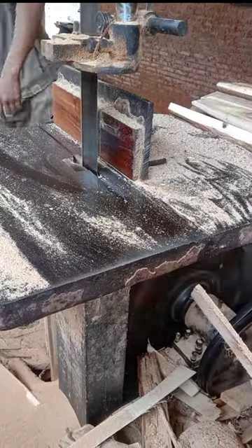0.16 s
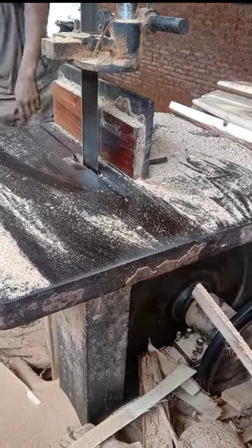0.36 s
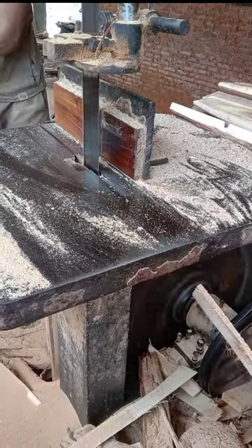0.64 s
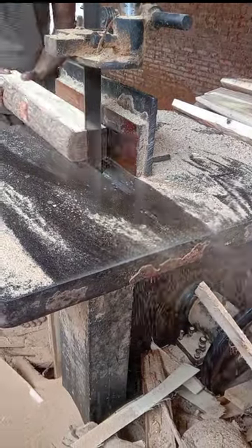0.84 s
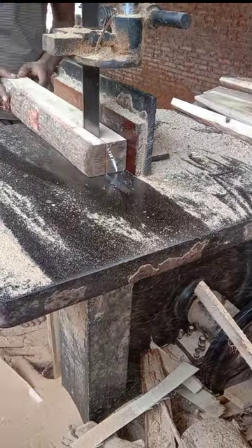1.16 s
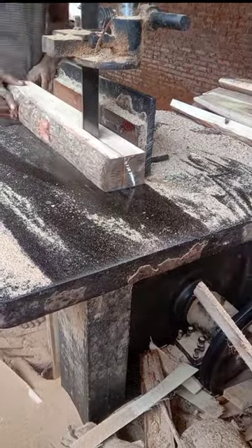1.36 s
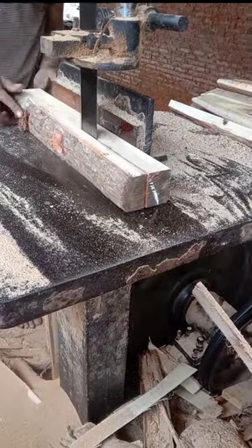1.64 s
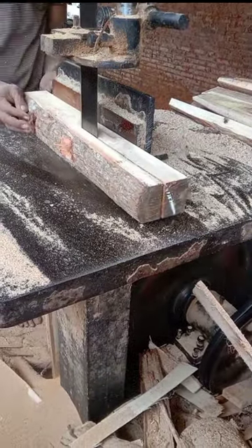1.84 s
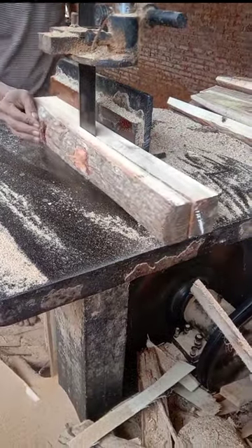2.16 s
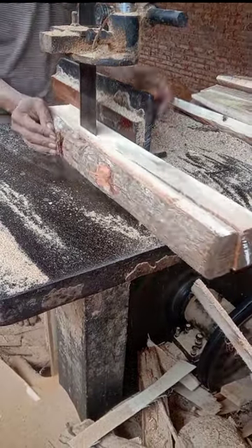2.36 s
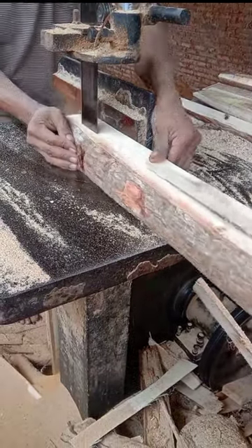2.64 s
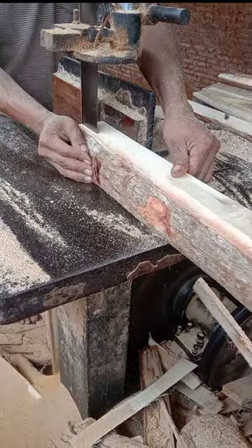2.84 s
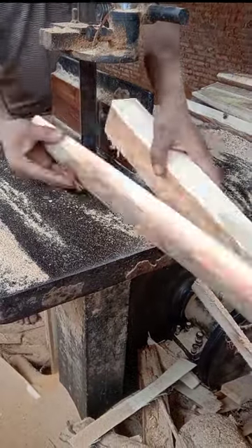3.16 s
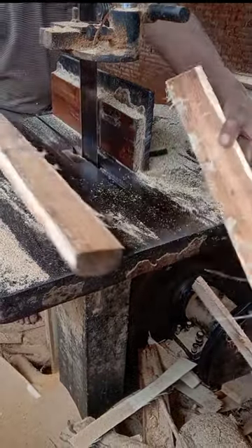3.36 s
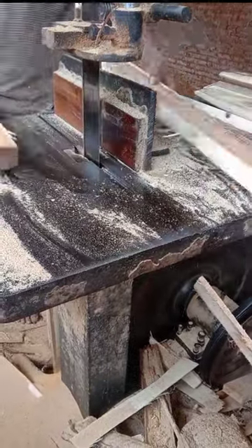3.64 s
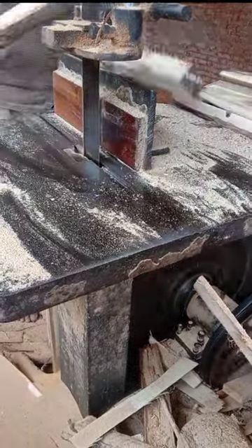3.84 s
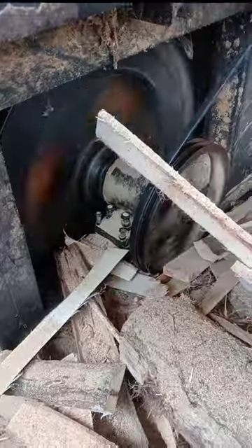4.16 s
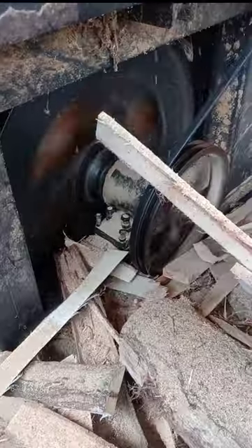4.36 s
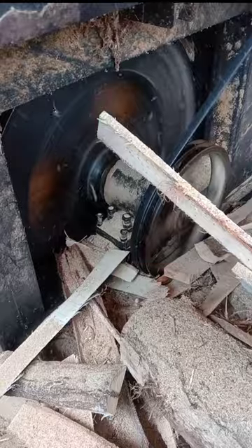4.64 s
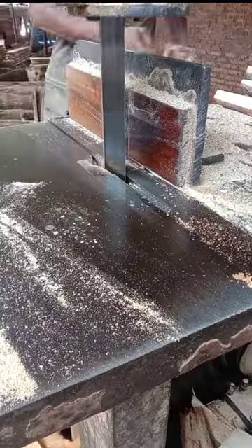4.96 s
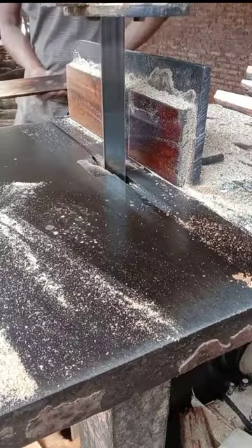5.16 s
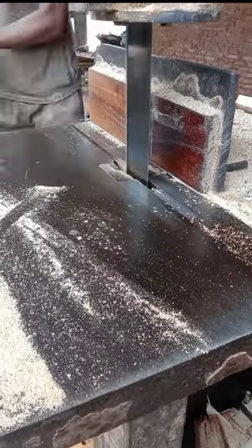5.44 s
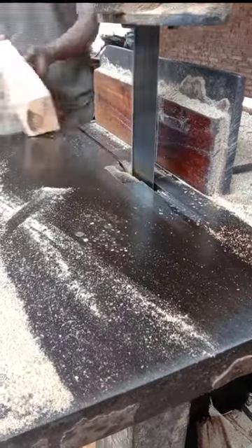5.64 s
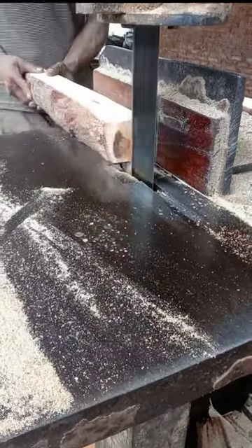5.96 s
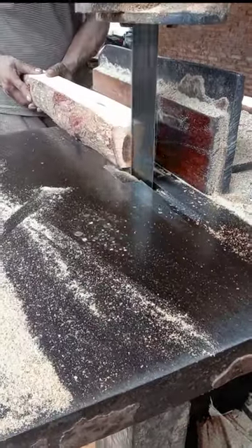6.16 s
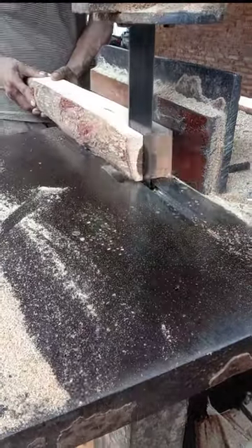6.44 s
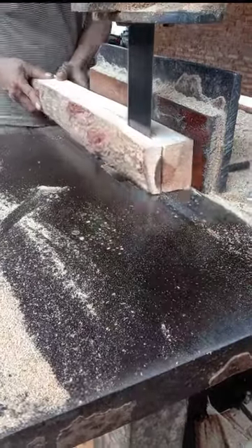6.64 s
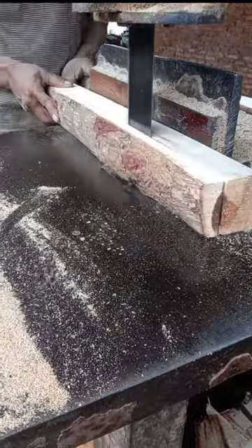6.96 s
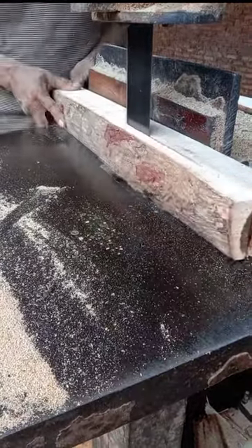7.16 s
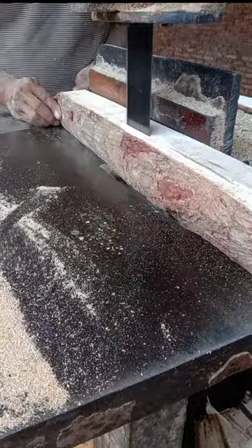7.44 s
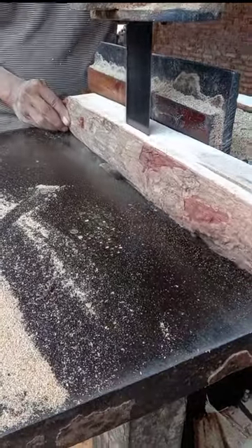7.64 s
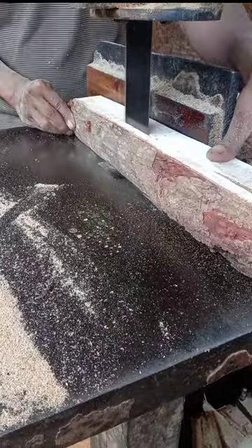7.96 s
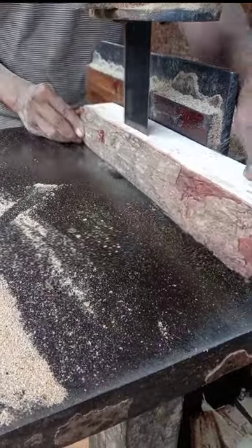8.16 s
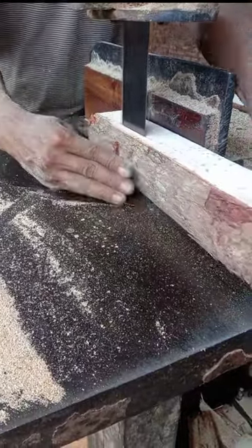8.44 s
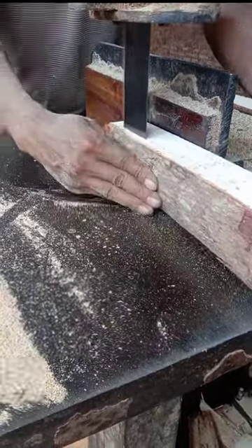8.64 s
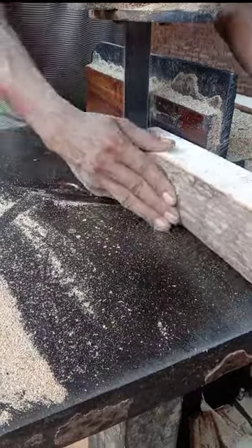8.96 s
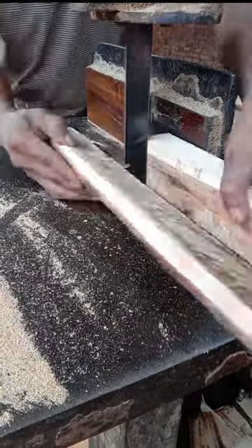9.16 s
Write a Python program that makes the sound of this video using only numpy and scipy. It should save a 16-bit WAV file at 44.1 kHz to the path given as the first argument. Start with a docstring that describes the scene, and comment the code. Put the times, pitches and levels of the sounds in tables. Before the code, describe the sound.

A thumping engine drives a hissing, ringing band saw in a workshop, with two timbers ripped lengthwise, the second rasping and whining louder.

```python
"""In an open brick workshop a single-cylinder engine thumps and a band saw runs free: wheels ring, blade hisses.
From 0.8 to 2.9 s a timber is ripped: wood rubs, chips tap near the microphone, teeth rasp and whine.
At 4.0 and 4.6 s the listening spot changes at once, from beside the table to the lower wheel, then before the blade.
From 6.2 to 8.8 s a second timber is ripped, louder, with more rubs and taps; then the saw runs free again.
Pulses ring resonances for the exhaust, shaped noise makes rings and hisses, sines make the whine."""
import sys
import numpy as np
from scipy import signal
from scipy.fft import rfft, irfft
from scipy.io import wavfile

SR = 44100
rng = np.random.default_rng(int(sys.argv[2]) if len(sys.argv) > 2 else 0)


def put_to_file(sound):
    """Save the sound as 16-bit audio at rate SR, in the file named by the first command-line argument."""
    columns = np.atleast_2d(sound).T  # one column per channel
    safe = np.clip(columns, -1, 1)
    whole_steps = np.round(safe * 32767)
    wavfile.write(sys.argv[1], SR, whole_steps.astype(np.int16))


N = 410130

# Listening spots: beside the table, by the lower wheel, before the blade. Each entry: start in seconds.
SPOT_STARTS = [0, 4.0, 4.6]
# The machine running free. Each row is a spot: exhaust, wheel ring, housing drone, guide hiss, air hiss, all in dB.
SPOT_LEVELS = [(-29, -27, -31.5, -26, -29.5), (-29, -21, -31, -27, -33), (-29.5, -23, -34, -26, -30)]
# Timber on the table shades those five layers, in the same order. Each entry: change in dB while cutting.
TIMBER_SHADE = [-1.3, -0.83, -0.5, -1.43, -2]
# Rise and fall about those levels. Each row: time in seconds, whole machine in dB, extra for the air hiss in dB.
SWELL = [(0, 0.1, 1), (.75, -0.7, 2), (1.5, -0.1, 0.5), (2.1, 0.1, -0.5), (2.75, -.5, -1.5), (2.9, 1.3, -2),
         (3.2, 0, 0.5), (4.0, 0.2, -0.5), (4.6, 0.4, 0.5), (5.5, -.2, 1.2), (6.1, .2, 1.3), (6.33, -2.5, 2),
         (6.5, .4, 1.5), (7.15, 0.5, -1.2), (7.45, -0.8, -3), (7.7, 0.4, -2), (8.3, -0.7, 0.5),
         (8.8, .5, -3.5), (9.3, 0.1, -0.5)]

# Engine speed, sagging in the cuts and stepping near the changes of spot. Each row: time in seconds, firings per s.
ENGINE_SPEED = [(0, 22.24), (.45, 22.3), (.8, 22.63), (1.3, 21.99), (2.4, 21.54), (2.88, 21.54),
                (3.1, 22.04), (3.7, 22.32), (4.0, 22.5), (4.01, 21.76), (4.58, 21.77), (4.6, 22.15),
                (5.7, 22.57), (6.45, 22.33), (6.85, 21.73), (8.65, 21.84), (8.9, 21.96), (9.3, 22.3)]
# Jumps of the beat. Each row: time in seconds, share of a firing cycle lost (gained if negative).
BEAT_JUMPS = [(.67, 0.3), (4.0, 0.25), (4.6, .21), (5.33, -0.43)]
# Tones of the exhaust pipe. Each row: pitch in Hz, width of one filter pass in Hz, relative level in dB,
# delay after the firing in ms.
EXHAUST_TONES = [(89, 31, -26.5, 1.9), (137.6, 30.5, -10, 1.07), (179.4, 104, -2, 4.77),
                 (218, 183, 3.5, 21.43), (301.3, 77, 2, 31), (408.4, 41, -10, 12.28), (490, 49, -7.5, 21),
                 (560.4, 46.7, -4, 13), (644, 43, -12.5, 20)]
# Uneven colour of the exhaust: weak near 154 and 220 Hz, strong near 176 Hz.
# Each row: frequency in Hz, gain in dB.
EXHAUST_COLOUR = [(40, 2.5), (135, 1.5), (154, -7.5), (176, 4.5), (198, -2.5), (220, -3.5), (243, 1.5),
                  (270, 0), (1500, 0.5)]
# Rumble of frame and belt. Each row: frequency in Hz, relative level in dB per Hz.
RUMBLE_SPECTRUM = [(15, -62), (25, -8), (81, -20), (172, 3), (303, -10), (371, -3), (557, -2.5), (702, -25),
                   (800, -14.5), (1040, -51), (1760, -120)]
# Ring of the wheels. Each row: pitch in Hz, width of one filter pass in Hz, relative level at each spot in dB.
WHEEL_MODES = [(2207, 13, -1, -7, 0.5), (2246, 39, 0, -5, -10), (2297, 28, -7, -14, -4),
               (2323, 36, -7, -5, -5.5), (2353, 26, 2, -3, -4), (2391, 37, -2, 1.5, -0.5),
               (2454, 55, -1.5, 0, -7), (2481, 27, -2, -6, -3), (2539, 154, -8, -5, -12.5)]
# Drone of the housing, one list a spot. Each row: frequency in Hz, relative level in dB per Hz.
HOUSING_SPECTRA = [
    [(360, -13), (620, -14), (800, -11.5), (980, -15.5), (1070, -10.5), (1240, -18), (1290, -10.5),
     (1870, -7), (2110, -7), (2150, -3), (2800, -40), (4730, -120)],
    [(360, -16), (620, -5), (748, -21), (779, -12), (965, -11), (1130, -6), (1420, -1), (1570, -7),
     (1850, -9), (2150, -5.5), (2800, -36), (4730, -120)],
    [(360, -41), (620, -14), (752, -14.5), (830, -9), (916, -12), (1000, -9), (1570, -4), (1920, -14),
     (2110, -3.5), (2150, -8), (2800, -47), (4730, -120)],
]
# Hiss of the blade guides, one list a spot. Each row: frequency in Hz, relative level in dB per Hz.
GUIDE_SPECTRA = [
    [(1560, -16), (2650, -3.5), (3110, -2), (4020, -6.5), (4740, -4), (5450, -7.5), (5720, -4.5),
     (6000, -3.5), (6640, -2), (7200, -6), (7470, -3), (9500, -8), (12400, -31), (20900, -120)],
    [(1560, -33), (2650, -7), (3190, -9.5), (3440, -12), (4080, -7.5), (5000, -9), (6640, -6),
     (7960, -11.5), (8220, -14), (9500, -16.5), (12400, -38), (20900, -120)],
    [(1560, -14), (2650, -8), (2710, -6.5), (2890, -6), (3790, -7.5), (4430, -6), (4980, -7), (5660, -6),
     (5840, -13), (6130, -0.5), (7840, -9), (9500, -10.5), (12400, -30), (20900, -120)],
]
# Narrow rings of the blade. Each row: pitch in Hz, width in Hz, relative level at each spot in dB.
BLADE_MODES = [(3540, 200, -10, -4, -11), (4637, 130, -8.5, -7, -20), (4930, 79, -3, -20, -22),
               (5985, 110, 1, -5, 4.5), (6180, 64, -0.5, -3, -4), (6750, 92, -11, -3, 0.5),
               (6890, 150, 0, -14, 1.5), (7070, 110, 2.5, -9, -7), (7380, 110, -2, -14, 0.5),
               (7700, 68, -6, 0, -10), (8240, 130, -10, -18, -4), (8740, 110, -12, -9, -10),
               (9250, 100, -8, -6, -10), (9900, 70, -20, -9, -6), (10340, 80, -11, -9, -21),
               (10700, 90, -16, -10, -20), (11490, 110, -3.5, -13, -9), (12650, 120, -13, -11, -13.5),
               (13370, 100, -16, -10, -8)]
# Hiss of the air. Each row: frequency in Hz, relative level in dB per Hz.
AIR_SPECTRUM = [(5000, -8.5), (8500, -3.5), (8740, -9.5), (9740, -4), (10300, -3.5), (13100, -0.5),
                (13900, -5), (15700, -16.5)]

# Rubs of wood, dull on the table, shrill on the blade. Each row: start in seconds, length in seconds,
# pitch in Hz, width of one filter pass in Hz, level in dB.
WOOD_RUBS = [(.68, 0.39, 149, 150, -39), (0.832, 0.12, 1630, 60, -41), (.84, 0.069, 11300, 500, -32),
             (1.02, .04, 10900, 200, -34), (1.9, 0.13, 4450, 500, -32), (2.836, 0.077, 3050, 400, -30),
             (3.422, 0.13, 200, 200, -36), (4.609, .02, 1590, 300, -27), (6.131, 0.21, 170, 200, -39),
             (6.65, 0.71, 5320, 1600, -27.5), (7.718, 0.2, 300.4, 400, -34), (8.02, .05, 5130, 199.2, -34),
             (8.101, 0.085, 250, 300, -36), (8.665, 0.079, 4790, 200, -35), (8.7, 0.17, 250, 300, -32),
             (8.788, 0.4, 3560, 160, -35)]
# Chips and timber bumps. Each row: time in seconds, strength in dB.
TAPS = [(0.774, -21), (0.829, -21), (6.191, -19), (6.301, -19.5), (6.342, -21), (6.367, -23), (6.54, -23),
        (6.609, -20), (7.774, -34), (8.143, -21), (8.645, -24)]
# Modes of a tap. Each row: pitch in Hz, relative level in dB, time to fall by 60 dB in seconds.
TAP_MODES = [(350, 1, 0.01), (675, 4.5, 0.0059), (1100, -3.5, 0.0059)]
# The two cuts. Each row: teeth enter in seconds, teeth leave in seconds, high whine in dB.
CUTS = [(.78, 2.86, -50), (6.2, 8.78, -49)]
# How hard the teeth bite. Each row: time in seconds, rasp in dB, low whine in dB.
BITE = [(.8, -47, -54), (1.2, -44, -54), (1.6, -38, -55), (2.4, -36.5, -52), (2.86, -41, -52),
        (6.2, -39, -48), (6.6, -30.5, -43), (7.0, -33.5, -44), (7.2, -30.5, -46), (7.5, -33.5, -42),
        (8.05, -30.5, -36.5), (8.14, -29, -41), (8.22, -31, -36.5), (8.45, -33, -38.5), (8.6, -31.5, -42),
        (8.75, -27, -42)]
# Rasp of teeth in wood. Each row: frequency in Hz, relative level in dB per Hz.
RASP_SPECTRUM = [(2500, 3.5), (3200, -1.5), (4200, 2), (5200, 7.5), (6500, -8), (9000, -60), (13000, -23),
                 (15500, -6)]
# Whine of the teeth. Each row: multiple of the tooth rate, relative level in dB.
TOOTH_OVERTONES = [(2, -5.5), (3, -18), (4, -2), (5, 4.5), (6, -15), (7, 3), (8, -10), (9, -6), (12, -11),
                   (13, 5), (14, 1), (15, -11), (16, 10), (17, 5), (18, -6), (19, -8)]

FIRING_SPREAD_DB, FIRING_JITTER_MS, TONE_WANDER_DB = 0.8, 0.08, 1.3
# The labouring engine sounds deeper: tones under DEEP_HZ gain LABOUR_DB per firing a second lost.
DEEP_HZ, FREE_FIRINGS_PER_S, LABOUR_DB = 200, 22, 4.5
RUMBLE_DB = -43
BLADE_RING_DB, WOOD_DAMPING_DB = -4, -2   # wood around the blade damps its rings
ECHO_DB, ECHO_SPAN_MS = -18, 5   # close reflections from table and wall
TAP_LOW_HZ = 200
ENTER_S, LEAVE_S = 0.062, 0.066
TEETH_PER_FIRING = 37
HIGH_WHINE_FROM = 10   # first tooth multiple counted as high
MIC_LOW_HZ, CUTOFF_HZ = 29.8, 15500


def from_db(db):
    """Gain of a level in dB."""
    return np.exp(np.asarray(db) * (np.log(10) / 20))


def rms_one(x):
    """Scales to rms 1."""
    return x / np.sqrt(np.mean(x ** 2) + 1e-20)


def in_time(rows):
    """Each column of a curve at every sample, joined by straight lines."""
    times, *columns = np.transpose(rows)
    return [np.interp(np.arange(N) / SR, times, column) for column in columns]


def by_spot(sounds):
    """Plays each spot's sound while the listener is there."""
    spot = np.searchsorted(SPOT_STARTS, np.arange(N) / SR, "right") - 1
    return np.choose(spot, sounds)


def drift(rate_hz):
    """Slow random wander of rms 1: noise through two equal low-pass poles."""
    step = 40   # samples between computed points
    r = np.exp(-2 * np.pi * rate_hz * step / SR)
    noise = rng.standard_normal(N // step + 2002)
    slow = signal.lfilter([1], [1, -2 * r, r * r], noise)[2000:]   # settled part only
    return np.interp(np.arange(N) / step, np.arange(len(slow)), rms_one(slow))


def resonance(x, hz, width_hz):
    """Two-pole band-pass, gain about 1 on top."""
    r = np.exp(-np.pi * width_hz / SR)
    poles = [1, -2 * r * np.cos(2 * np.pi * hz / SR), r * r]
    return signal.lfilter([(1 - r * r) / 2, 0, (r * r - 1) / 2], poles, x)


def steep(x, hz, width_hz, count):
    """The same resonance several times over: steep skirts, soft rise and fall."""
    for _ in range(count):
        x = resonance(x, hz, width_hz)
    return x


def coloured(x, spectrum):
    """Shapes a signal by (Hz, dB) points, 90 dB down outside them; rms 1."""
    hz, level_db = np.transpose(spectrum)
    grid_hz = np.maximum(np.arange(N // 2 + 1) * SR / N, 1)
    gain = from_db(np.interp(np.log(grid_hz), np.log(hz), level_db, left=-90, right=-90))
    return rms_one(irfft(rfft(x) * gain, N))


def hiss(spectrum, flutter_db):
    """Coloured noise whose level flutters; rms 1."""
    flutter = from_db(flutter_db * drift(35.0))
    return coloured(rng.standard_normal(N) * flutter, spectrum)


def ringing(modes, flutter_db, count):
    """Friction noise keeps every mode ringing, each swelling on its own; one sound a spot, rms 1."""
    friction = rng.standard_normal(N)
    rings = []
    for k, (hz, width_hz, *_) in enumerate(modes):
        swelling = from_db(flutter_db * drift(2.7))
        rings.append((-1) ** k * swelling * steep(friction, hz, width_hz, count))
    return [rms_one(from_db(spot_db) @ rings) for spot_db in np.transpose(modes)[2:]]


def reflected(x):
    """Eight close echoes of random delay ripple the spectrum; rms 1."""
    lags = (rng.uniform(0.15, 1, 8) * ECHO_SPAN_MS * SR / 1000).astype(int)
    echoes = sum((-1) ** k * np.roll(x, lag) for k, lag in enumerate(lags))
    return rms_one(x + from_db(ECHO_DB) * echoes)


def crank():
    """Firing cycles done so far: the engine speed summed up, with the jumps of the beat."""
    turns = np.cumsum(in_time(ENGINE_SPEED)[0]) / SR + 0.2
    return turns - sum(share * (np.arange(N) > s * SR) for s, share in BEAT_JUMPS)


def exhaust(turns):
    """Each firing sends a pulse into every pipe tone after its own delay; each tone swells and dies softly."""
    cycles = np.maximum.accumulate(np.floor(turns))   # a lost share never fires twice
    firings = np.flatnonzero(np.diff(cycles))
    firings = np.r_[2 * firings[0] - firings[1], firings]   # one already under way at the start
    chance = rng.standard_normal((len(firings), 2))
    deep_db = LABOUR_DB * (FREE_FIRINGS_PER_S - in_time(ENGINE_SPEED)[0])
    out = np.zeros(N)
    for hz, width_hz, level_db, delay_ms in EXHAUST_TONES:
        delay = (delay_ms + FIRING_JITTER_MS * chance[:, 0]) * SR / 1000
        when = np.clip(firings + delay.astype(int), 0, N - 1)
        pulses = np.full(N, 1e-18)   # tiny floor keeps the filters quick
        pulses[when] = from_db(FIRING_SPREAD_DB * chance[:, 1])
        tone = rms_one(steep(pulses, hz, width_hz, count=3))
        tone_db = level_db + deep_db * (hz < DEEP_HZ) + TONE_WANDER_DB * drift(1.32)
        out += from_db(tone_db) * tone
    return coloured(out, EXHAUST_COLOUR)


def rumble():
    """Frame and belt shake: low noise, fluttering slightly."""
    return hiss(RUMBLE_SPECTRUM, flutter_db=-0.5)


def wheels():
    """Friction keeps the saw wheels ringing in a narrow cluster of modes."""
    return by_spot(ringing(WHEEL_MODES, flutter_db=1.0, count=2))


def housing():
    """The housing drones: noise in the middle range, coloured by the spot."""
    return by_spot([hiss(spectrum, flutter_db=1.37) for spectrum in HOUSING_SPECTRA])


def guides(cutting):
    """The blade hisses in its guides and rings in narrow modes, damped by wood."""
    guide_hiss = by_spot([reflected(hiss(spectrum, flutter_db=0.93)) for spectrum in GUIDE_SPECTRA])
    blade_ring = by_spot(ringing(BLADE_MODES, flutter_db=2.0, count=1))
    return guide_hiss + from_db(BLADE_RING_DB + WOOD_DAMPING_DB * cutting) * blade_ring


def air():
    """High air hiss with fresh close echoes at each spot."""
    return by_spot([reflected(hiss(AIR_SPECTRUM, flutter_db=1.04)) for _ in SPOT_STARTS])


def rubs():
    """Wood rubs: noise in one resonance, swelling and fading."""
    out = np.zeros(N)
    for s, length_s, hz, width_hz, level_db in WOOD_RUBS:
        at, size = int(s * SR), int(length_s * SR)
        tone = rms_one(steep(rng.standard_normal(size), hz, width_hz, count=2))
        out[at:at + size] += from_db(level_db) * tone * signal.windows.tukey(size, 0.8)
    return out


def taps():
    """Short dull knocks: each strikes decaying modes, every mode with a strength of its own."""
    s, strength_db = np.transpose(TAPS)
    chance = rng.standard_normal((len(s), len(TAP_MODES)))
    out = np.zeros(N)
    for k, (hz, level_db, t60_s) in enumerate(TAP_MODES):
        clicks = np.full(N, 1e-18)
        clicks[(s * SR).astype(int)] = from_db(strength_db + level_db + 1.5 * chance[:, k])
        r = from_db(-60 / (t60_s * SR))   # decay per sample
        w = 2 * np.pi * hz / SR
        out += signal.lfilter([0, np.sin(w)], [1, -2 * r * np.cos(w), r * r], clicks)
    return signal.sosfilt(signal.butter(2, TAP_LOW_HZ, "high", fs=SR, output="sos"), out)


def in_wood(start_s, end_s):
    """0 to 1 as the teeth enter the timber, back to 0 as they leave."""
    t = np.arange(N) / SR
    return np.clip(np.minimum((t - start_s) / ENTER_S, (end_s - t) / LEAVE_S), 0, 1)


def teeth(turns, low_db, high_db):
    """Teeth bite at a fixed multiple of the engine rate; each overtone swells on its own."""
    phase = 2 * np.pi * TEETH_PER_FIRING * turns + 0.31 * drift(7.2)
    out = np.zeros(N)
    for k, level_db in TOOTH_OVERTONES:
        if k < HIGH_WHINE_FROM:
            whine_db = low_db + 2.8 * drift(13.0)
        else:
            whine_db = high_db + 4.3 * drift(3.0)
        out += from_db(level_db + whine_db) * np.sin(k * phase + k * k)   # k * k scatters the phases
    return out


def cut(turns):
    """Rasp and low whine follow the bite; the high whine has one level for each cut."""
    rasp_db, low_db = in_time(BITE)
    enter_s, _, high_db = np.transpose(CUTS)
    which = np.maximum(np.searchsorted(enter_s, np.arange(N) / SR) - 1, 0)
    rasp = from_db(rasp_db) * reflected(hiss(RASP_SPECTRUM, flutter_db=2.5))
    return rasp + teeth(turns, low_db, high_db[which])


def scene():
    """Engine, running blade and cut, alike in both channels."""
    cutting = sum(in_wood(enter_s, leave_s) for enter_s, leave_s, _ in CUTS)
    swell_db, treble_db = in_time(SWELL)
    layer_db = []
    for free_db, shade_db in zip(np.transpose(SPOT_LEVELS), TIMBER_SHADE):
        layer_db.append(by_spot(free_db) + shade_db * cutting + swell_db)
    exhaust_db, ring_db, drone_db, guide_db, air_db = layer_db
    turns = crank()
    mix = from_db(exhaust_db) * exhaust(turns)
    mix += from_db(RUMBLE_DB) * rumble()
    mix += from_db(ring_db) * wheels()
    mix += from_db(drone_db) * housing()
    mix += from_db(guide_db) * guides(cutting)
    mix += from_db(air_db + treble_db) * air()
    mix += rubs() + taps()
    mix += cutting * cut(turns)
    return np.tile(mix, (2, 1))


def record(dry):
    """The microphone loses the deep bass; the top is cut steeply."""
    thin = signal.sosfilt(signal.butter(2, MIC_LOW_HZ, "high", fs=SR, output="sos"), dry)
    return signal.sosfilt(signal.ellip(14, 0.3, 90, CUTOFF_HZ, fs=SR, output="sos"), thin)


dry = scene()
out = record(dry)
put_to_file(out)
```